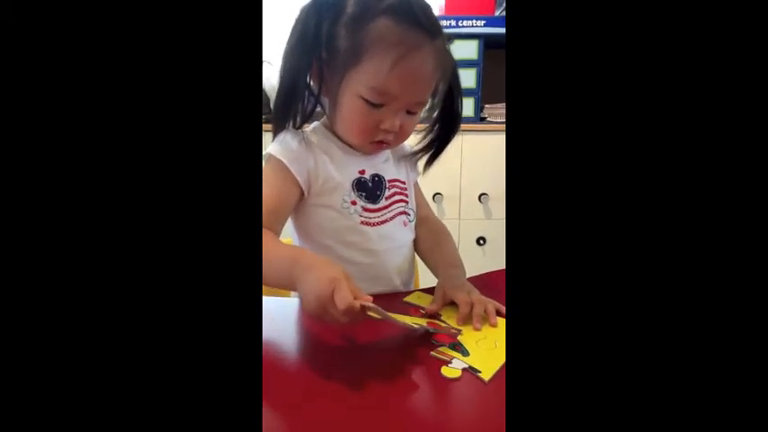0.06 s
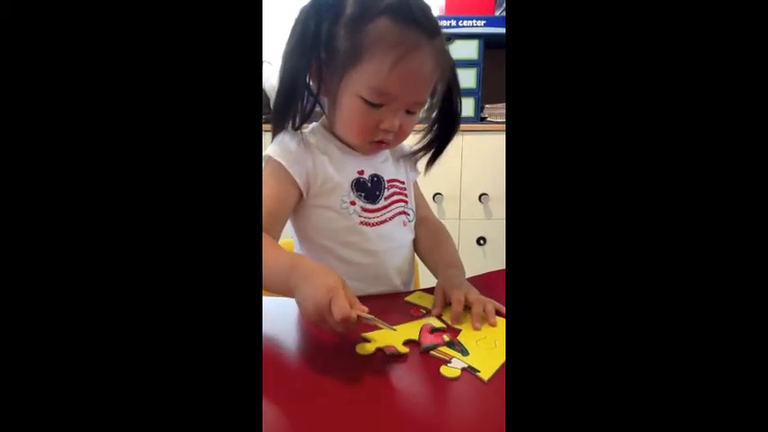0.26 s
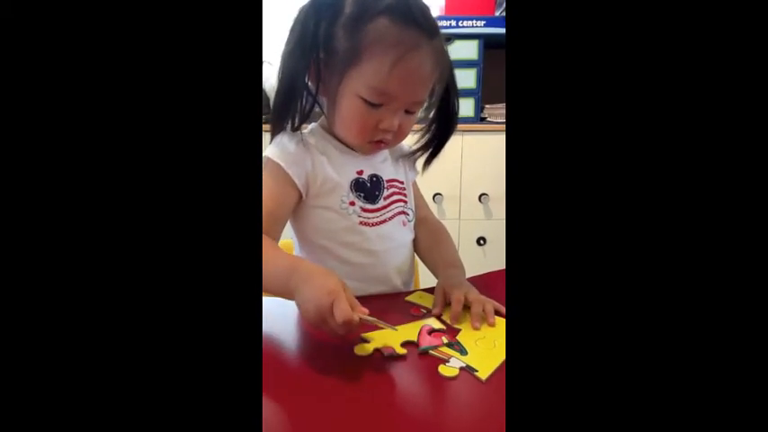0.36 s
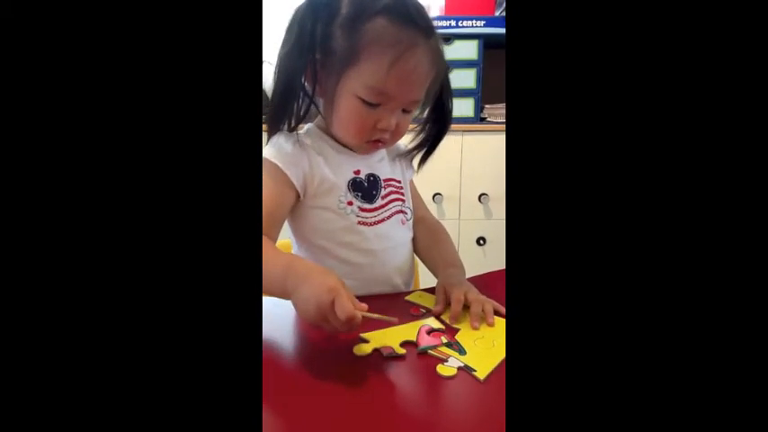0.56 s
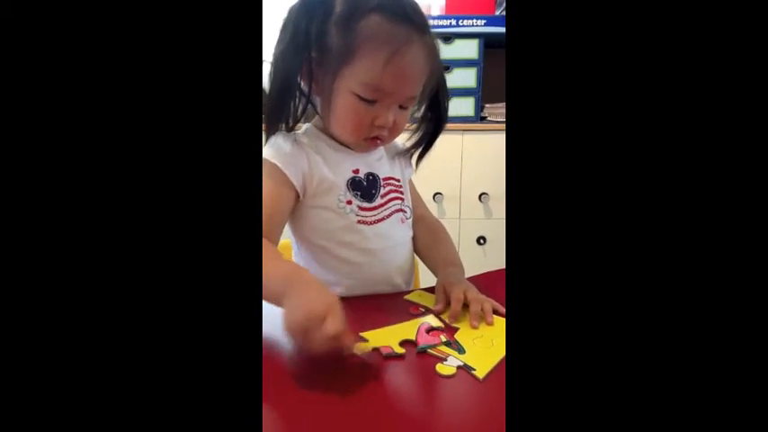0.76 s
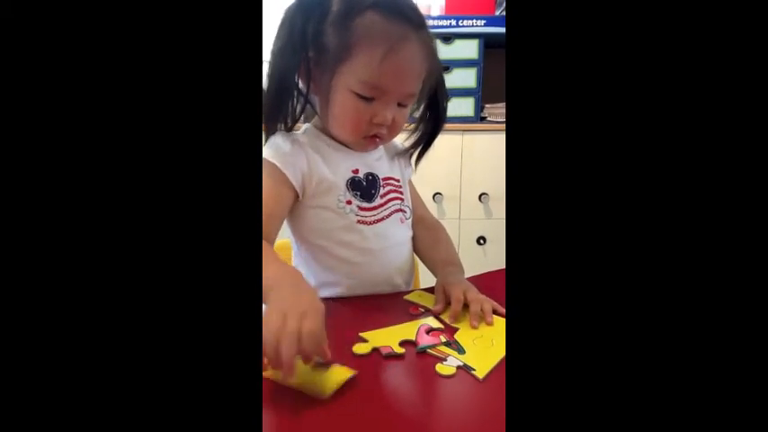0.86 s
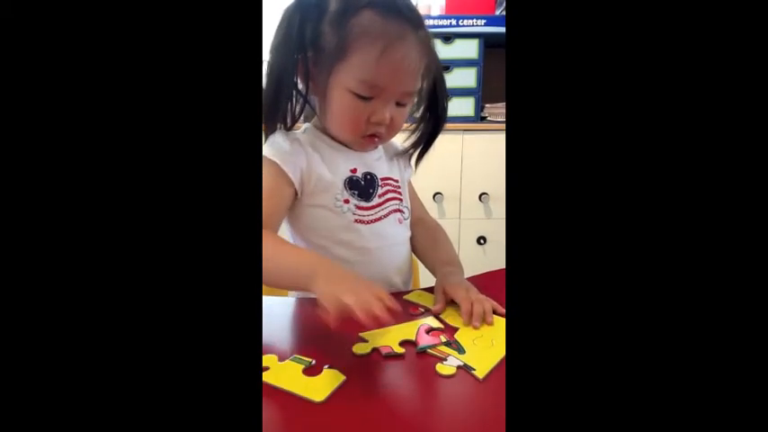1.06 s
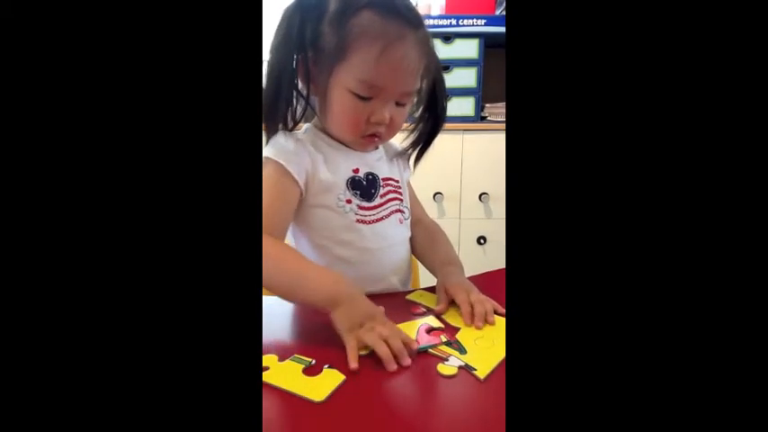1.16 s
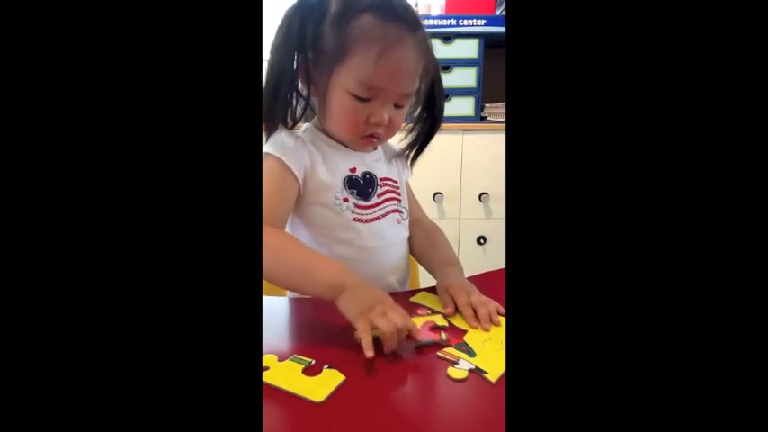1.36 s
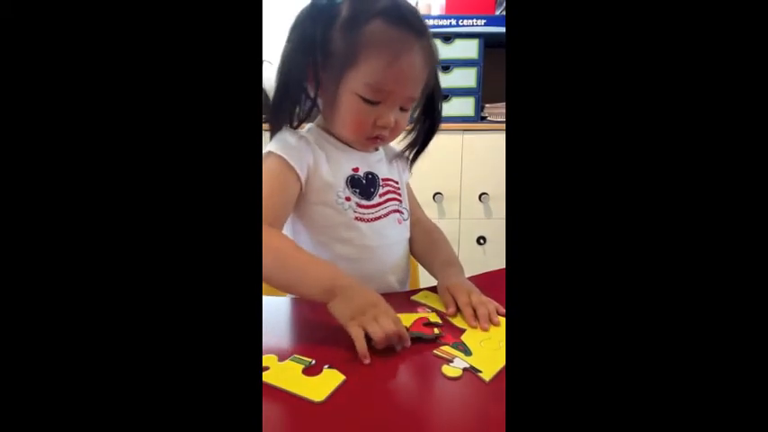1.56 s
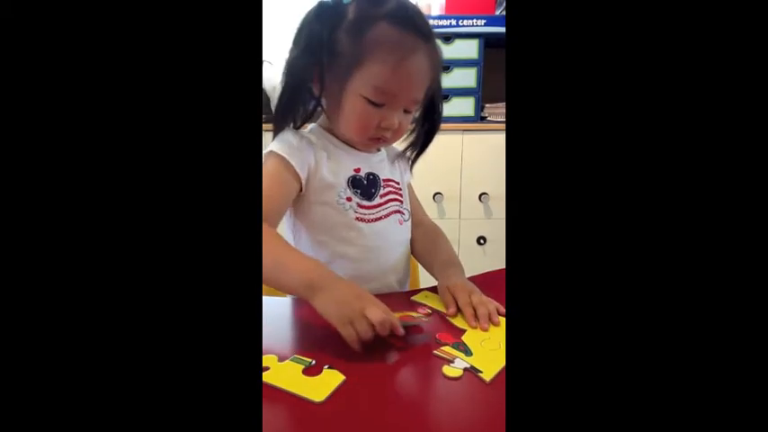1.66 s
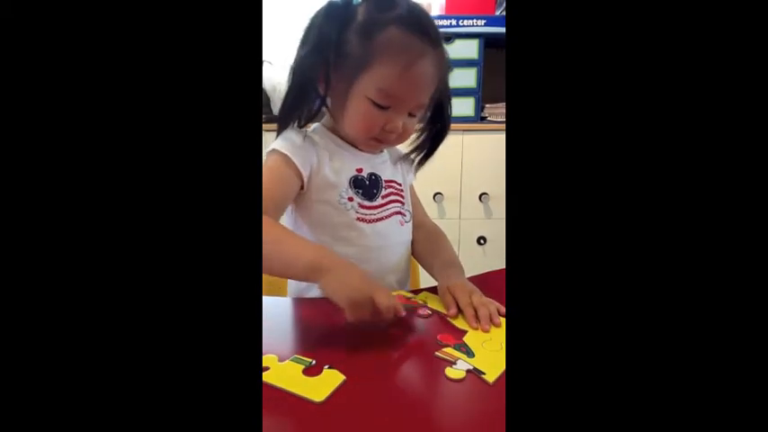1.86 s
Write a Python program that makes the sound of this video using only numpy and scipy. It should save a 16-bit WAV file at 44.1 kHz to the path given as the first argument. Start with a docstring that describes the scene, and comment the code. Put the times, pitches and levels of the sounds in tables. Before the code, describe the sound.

Stiff jigsaw pieces click and rattle as they are put down on a small table. A few sharp taps come first, then a soft hand bump, another click and faint sliding, heard close by in a quiet room.

```python
"""Stiff jigsaw pieces tap and click on their edges as they are put down on a small table.
Each tap is a click and a short rattle that rings in the piece and thumps the table top; one piece
slaps flat and sounds its own modes. A soft hand bumps the table, and pieces slide briefly with a
grainy rub. The quiet room answers each knock over a faint steady hiss."""
import sys
import numpy as np
from scipy import signal
from scipy.fft import rfft, irfft
from scipy.io import wavfile

SR = 44100
rng = np.random.default_rng(int(sys.argv[2]) if len(sys.argv) > 2 else 0)


def unload_wav(signal):
    """Save mono or channel-first audio to the path in sys.argv[1] as 16-bit WAV at rate SR, clipped to [-1, 1]."""
    wavfile.write(
        sys.argv[1],
        SR,
        np.round(np.clip(np.atleast_2d(signal).T, -1, 1) * 32767).astype(np.int16),
    )


N = 83790
T = np.arange(N) / SR
HZ = np.maximum(np.fft.rfftfreq(N, 1 / SR), 1)

# A piece hits the table. Each row: start in seconds, click level in dB, rattle in dB above the click,
# contact brightness in Hz, table thump in dB, thump cut-off in Hz, ring pitch in Hz, ring width in Hz,
# ring boost in dB, upper ring pitch in Hz, upper boost in dB, edge snap in dB relative to the click.
TAPS = [(0.169, -20.5, 4, 5800, -13, 495, 2050, 330, 16.5, 5500, 3, -21),
        (0.2175, -20, 9.5, 11000, -11, 706, 2000, 284, 11, 7800, 10, -22),
        (0.2228, -3, 3.5, 10400, -8.5, 670, 2090, 200, 8, 6030, 10, -7),
        (0.2243, -3, 6.5, 9000, -6, 790, 2040, 170, 14, 5920, 6.5, -8),
        (0.2329, -15, 5, 10900, -6.5, 815, 1110, 200, 1, 4880, 19, 5),
        (0.2376, -11.5, 5, 9000, -24, 885, 2400, 280, 8.5, 4720, 15, -5),
        (0.7035, -11.5, 2, 4200, -18, 402, 2470, 400, 6, 3300, 3.5, -23),
        (0.7070, -18.5, 8, 3400, -16, 483, 1940, 280, 12, 3100, 2, -22),
        (0.7124, -24.5, 11, 5200, -7, 596, 1860, 280, 13, 5000, -3, -20),
        (0.7264, -4.5, 0, 4950, -0.5, 775, 1886, 150, 21, 5650, 8, -24),
        (0.7377, -19, 7, 6000, -9, 600, 1250, 527, 17.5, 4130, -0.5, -24),
        (0.8548, -14, 4.5, 6660, -5, 300, 2000, 200, 21, 7500, 13.5, -4.5),
        (0.8577, -14, 4.5, 3000, -1.5, 500, 1990, 242, 20.5, 2700, 11.5, -14),
        (1.3425, -7, 1.5, 9650, -18, 630, 2270, 220.6, 12, 3250, 10.5, -18),
        (1.8854, -20, 4, 4300, -11, 260, 2270, 280, 13.5, 3480, 6, -22)]


def edge_taps():
    """A piece clicks and rattles through two of its resonances; its hard edge adds a bright snap."""
    out = 0
    for start, db, rattle_db, bright_hz, _, _, *ring, upper_hz, upper_db, snap_db in TAPS:
        contact = burst(t60=0.0285, click=from_db(-rattle_db), passes=2)
        contact *= np.hypot(1, from_db(rattle_db))  # click and rattle add in energy
        contact = cut(contact, bright_hz, "low", order=3)
        contact = cut(contact, 300, "high")
        body = resonate(contact, *ring)
        body = resonate(body, upper_hz, width_hz=310, boost_db=upper_db)
        snap = cut(dying_noise(t60=0.01), 9000, "high")
        out += at(start, from_db(db) * (body + from_db(snap_db) * snap))
    return out


def flat_slap():
    """One piece lands flat and rings in its own modes."""
    # Modes of the piece. Each row: pitch in Hz, relative level in dB, time to fall 60 dB in seconds.
    piece_modes = [(460, -6, 0.075), (466.5, 5, 0.086), (673, -6.5, .14), (818, -7, 0.1), (881, 1.5, 0.081),
                   (957, -9, 0.14), (1560, -19, 0.22), (2026, -5, 0.13), (4540, -8, 0.14),
                   (4590, -10, 0.092), (5200, -18, 0.15), (6000, -29, 0.061)]
    return at(0.2245, from_db(-28) * modes(piece_modes))


def table_knocks():
    """Tapping pieces and a soft hand push the table top: a short thud, then its low modes ring on."""
    # Modes of the top. Each row: pitch in Hz, relative level in dB, time to fall 60 dB in seconds.
    table_modes = [(120, -22, .3), (132, -9.5, 0.36), (183.5, -17.5, 0.26), (213.6, -16.5, 0.24),
                   (255, -8.5, 0.18), (291.4, -15, 0.17), (342.2, -6, 0.13), (407.4, -8.5, 0.078),
                   (468.5, -6, 0.13), (511, -9, 0.12), (656, -8.5, 0.078), (900, -3, 0.026)]
    # Hand bumps. Each row: start in seconds, level in dB, thump cut-off in Hz, softness cut-off in Hz.
    hand_bumps = [(1.0876, -5.5, 233, 440), (1.1125, -2.5, 210, 410), (1.1162, -6.5, 450, 566),
                  (1.1268, -13, 200, 300), (1.331, -20, 600, 900)]
    ring = from_db(-29) * modes(table_modes)

    def knock(db, thump_hz, ringing):
        push = burst(t60=0.035, click=from_db(-2))
        push = cut(push, thump_hz, "low", order=3)
        thud = unit(cut(push, 171, "high"))
        return from_db(db) * (ringing + from_db(-3) * thud)

    out = 0
    for start, _, _, _, db, thump_hz, *_ in TAPS:
        out += at(start, knock(db, thump_hz, ring))
    for start, db, thump_hz, soft_hz in hand_bumps:
        bump = knock(db, thump_hz, from_db(3.5) * ring)  # a heavy hand rings the top more than a piece
        out += at(start, cut(bump, soft_hz, "low", order=3))
    return out


def slides():
    """A piece or a finger slides: grainy friction that swells quickly and fades."""
    # Each row: start in seconds, length in seconds, level in dB, low cut in Hz, brightness in Hz.
    strokes = [(0.173, 0.04, -50.5, 250, 2180), (0.913, 0.056, -49.5, 900, 13000),
               (1.078, 0.045, -55.5, 1500, 2500), (1.311, 0.063, -53.5, 477, 9150),
               (1.545, 0.086, -60, 5000, 11000), (1.627, 0.039, -55.5, 6000, 7840),
               (1.836, 0.21, -57.5, 1200, 3930)]
    grain_db = 5
    out = 0
    for start, length, db, low_hz, bright_hz in strokes:
        grains = rng.standard_normal(N) * from_db(grain_db * rng.standard_normal(N))
        grains = cut(grains, bright_hz, "low")
        rub = unit(cut(grains, low_hz, "high")) * np.sqrt(N)
        progress = np.clip((T - start) / length, 0, 1)
        swell = np.sin(np.pi * progress ** 0.72)
        out += from_db(db) * rub * swell
    return out


def room_reverb(direct):
    """The room answers with dense early reflections and a longer tail, band by band."""
    # Each row: band centre in Hz, early reflections in dB, tail in dB, tail's 60 dB decay in seconds.
    bands = [(108, -7.5, -6, 0.87), (181, -11.5, -7, 0.32), (450, -11, -12.5, 0.42), (940, 1.5, -4.5, 0.28),
             (2170, -11.5, -10.5, 0.33), (4600, -10, -8.5, 0.33), (13000, -14, -7, 0.24)]
    first_echo_s = 0.008
    log_centres = np.log([band[0] for band in bands])
    early = rfft(burst(t60=0.1))
    spectrum = 0
    for selector, (_, early_db, tail_db, t60) in zip(np.eye(len(bands)), bands):
        tail = rfft(dying_noise(t60))
        crossfade = np.interp(np.log(HZ), log_centres, selector)
        spectrum += crossfade * (from_db(early_db) * early + from_db(tail_db) * tail)
    response = at(first_echo_s, irfft(spectrum, N)[:N // 2])
    reverb = signal.fftconvolve(direct, response)[:N]
    return cut(reverb, 108, "high", order=8)


def room_hiss():
    """Faint, steady room air, strongest in the low mids."""
    # Colour of the air. Each row: frequency in Hz, relative noise density in dB.
    air_spectrum = [(25, -27), (60, -25), (100, -20), (135, -6.5), (170, -4), (290, -1.5), (420, -6.5),
                    (600, -8.5), (1400, -8.5), (2600, -14.5), (3300, -18.5), (5000, -24.5), (10000, -26),
                    (15500, -28.5)]
    hz, db = np.transpose(air_spectrum)
    colour = from_db(np.interp(np.log(HZ), np.log(hz), db))
    air = irfft(rfft(rng.standard_normal(N)) * colour, N)
    return from_db(-51.5) * np.sqrt(N) * unit(air)


def from_db(db):
    """Decibels to gain."""
    return 10 ** (np.asarray(db) / 20)


def unit(x):
    """Scale to energy 1."""
    return x / np.sqrt(np.sum(x ** 2) + 1e-20)


def dying(t60):
    """Exponential decay that falls 60 dB in t60 seconds."""
    return np.exp(-np.log(1000) * np.minimum(T / t60, 10))


def dying_noise(t60):
    """Decaying white noise of energy 1."""
    return unit(rng.standard_normal(N) * dying(t60))


def cut(x, hz, kind, order=2):
    """Butterworth low- or high-pass."""
    return signal.sosfilt(signal.butter(order, hz, kind, fs=SR, output="sos"), x + 1e-18)


def resonate(x, hz, width_hz, boost_db):
    """Boost or dip one resonant band of a sound."""
    radius = np.exp(-np.pi * width_hz / SR)
    feedback = [1, -2 * radius * np.cos(2 * np.pi * hz / SR), radius ** 2]
    band = signal.lfilter([1, 0, -1], feedback, x) * (1 - radius ** 2) / 2
    return x + (from_db(boost_db) - 1) * band


def at(start, x):
    """Place a sound at its start time in seconds."""
    return np.concatenate([np.zeros(int(start * SR)), x])[:N]


def modes(table):
    """Decaying sines of a struck body."""
    return sum(from_db(db) * dying(t60) * np.sin(2 * np.pi * hz * T) for hz, db, t60 in table)


def burst(t60, click=0, passes=4):
    """Many short, dense modes: dying noise with an even spectrum, optionally led by a click."""
    x = click * (T == 0) + dying_noise(t60)
    for _ in range(passes):
        flat_spectrum = np.exp(1j * np.angle(rfft(x)))
        x = irfft(flat_spectrum, N) * dying(2 * passes * t60)
    return unit(x)


def scene():
    """Pieces and table in the room, in mono, with the deep bass cut from the knocks."""
    direct = edge_taps() + flat_slap() + table_knocks() + slides()
    direct = cut(direct, 122, "high", order=6)
    return (direct + room_reverb(direct) + room_hiss())[None]


def record(dry):
    """A steep low-pass takes off the highest treble."""
    cutoff_hz = 15450
    return signal.sosfilt(signal.ellip(10, .1, 70, cutoff_hz, fs=SR, output="sos"), dry)


dry = scene()
out = record(dry)
unload_wav(out)
```